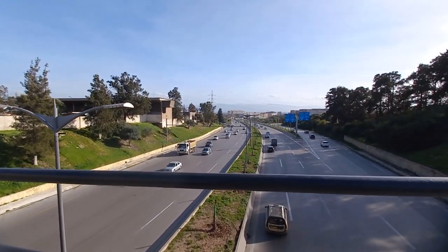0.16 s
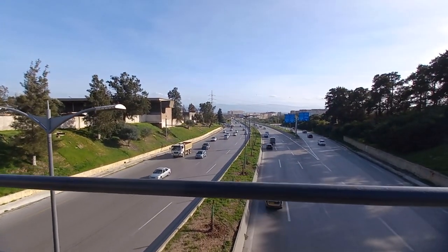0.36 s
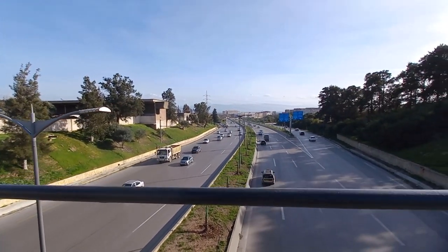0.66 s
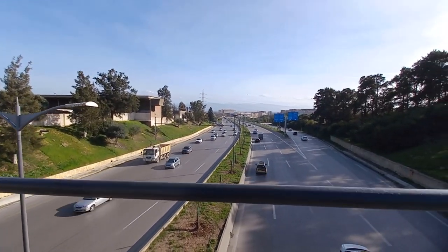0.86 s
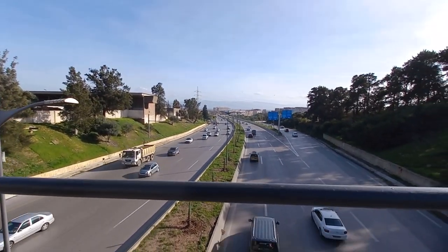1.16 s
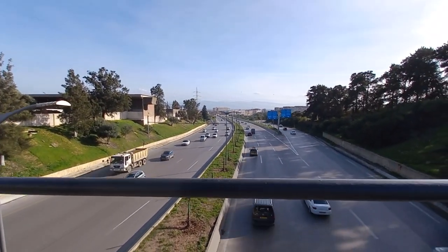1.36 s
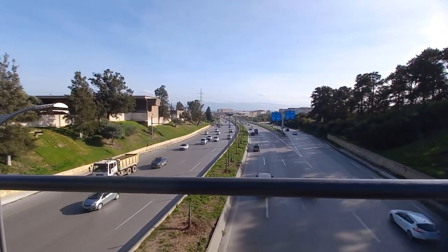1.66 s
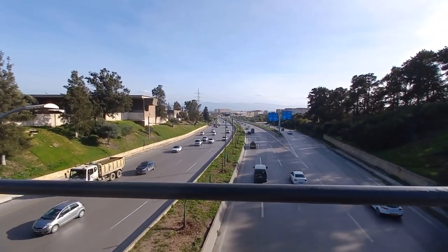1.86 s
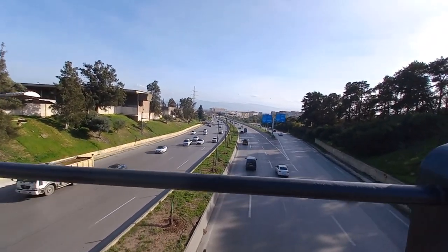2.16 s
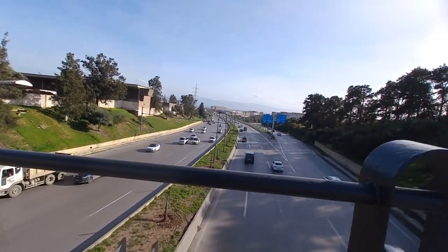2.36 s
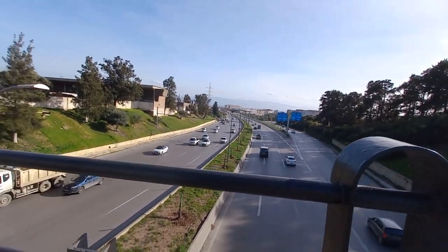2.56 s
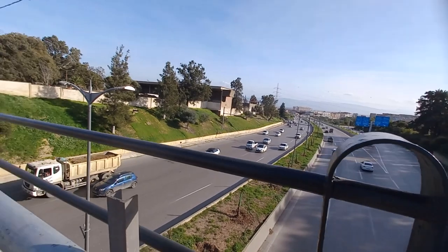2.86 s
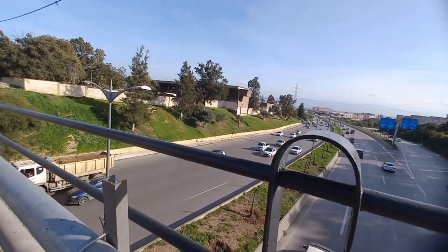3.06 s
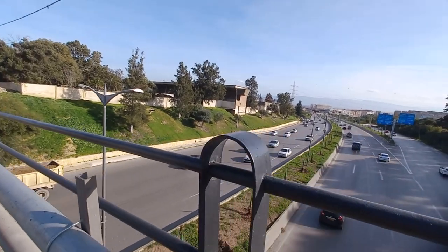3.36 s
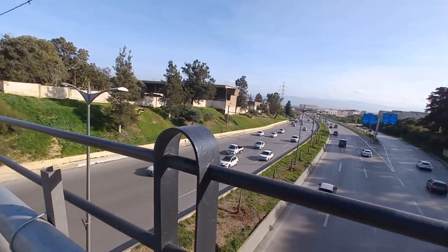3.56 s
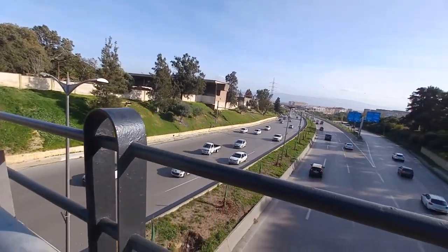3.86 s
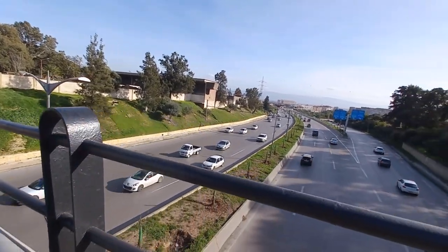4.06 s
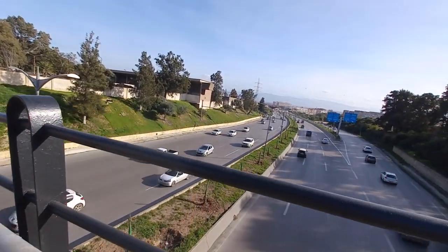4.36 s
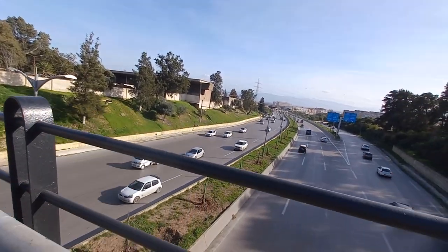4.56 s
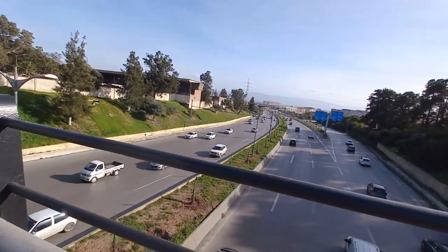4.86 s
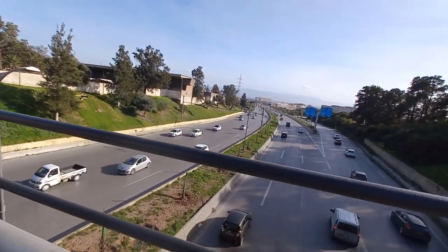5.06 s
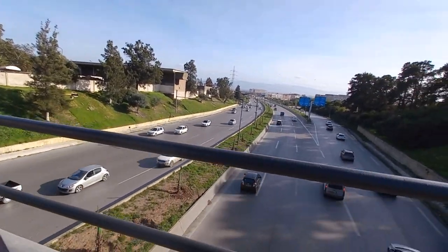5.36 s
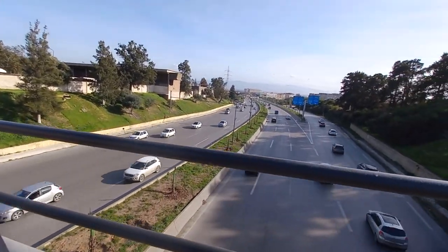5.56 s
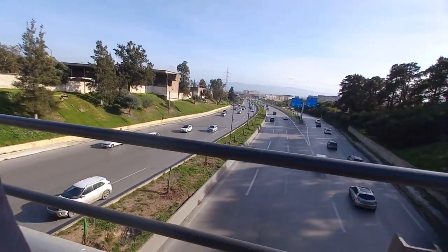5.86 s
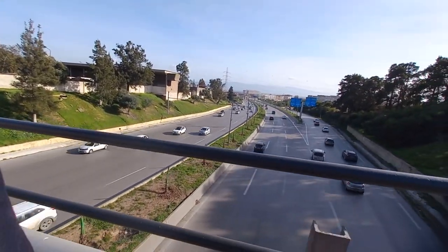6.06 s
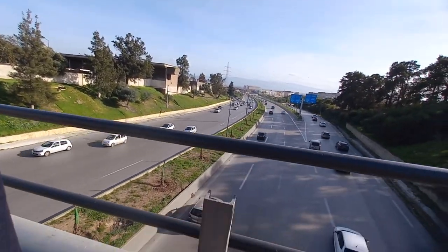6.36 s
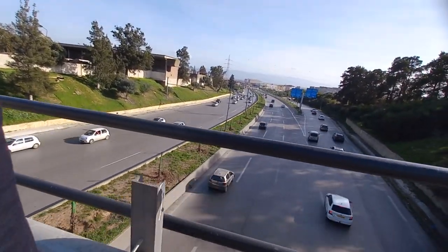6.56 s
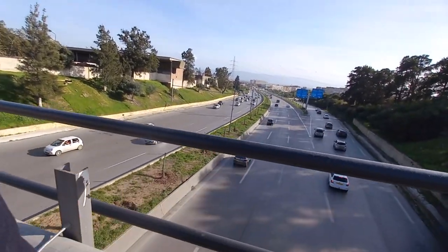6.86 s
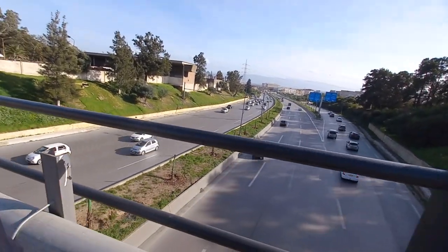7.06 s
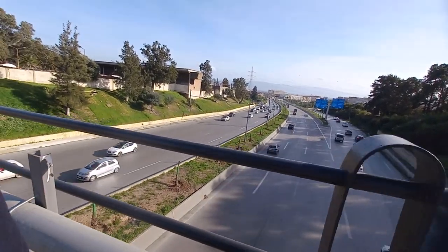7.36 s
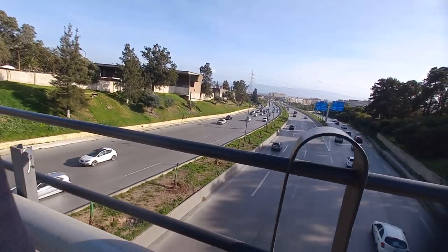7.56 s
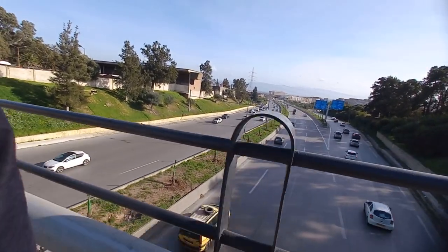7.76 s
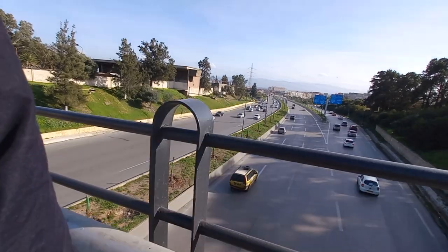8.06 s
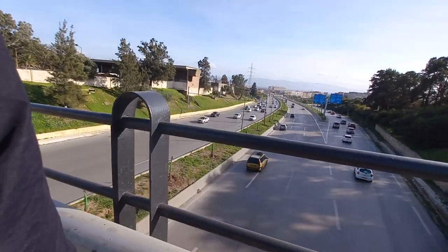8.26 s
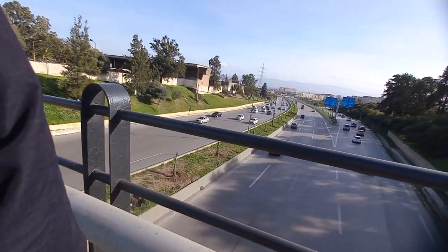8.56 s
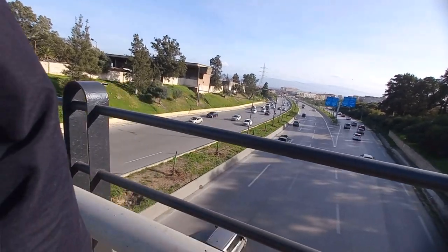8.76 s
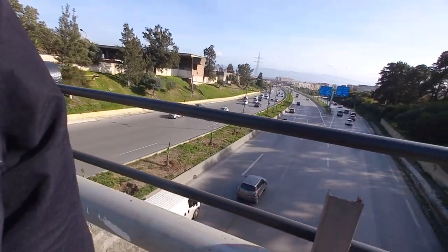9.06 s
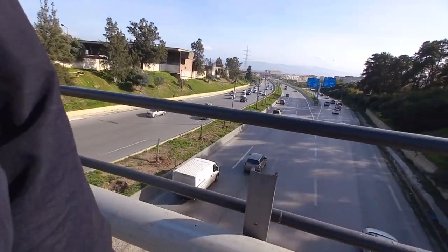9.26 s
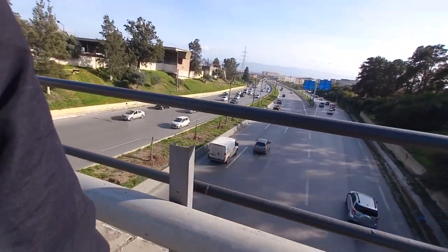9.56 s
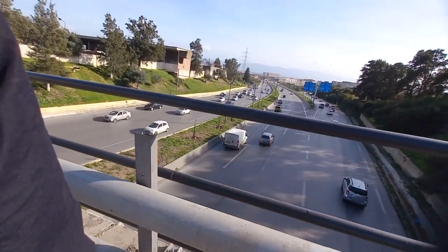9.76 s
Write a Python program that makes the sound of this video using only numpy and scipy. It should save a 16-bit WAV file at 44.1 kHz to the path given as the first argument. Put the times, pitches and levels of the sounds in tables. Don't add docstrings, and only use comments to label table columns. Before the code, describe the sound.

Broad tyre roar and hiss from many cars passing underneath, faint engine drones early and late, low deck rumble and a few short thuds.

```python
import sys
import numpy as np
from scipy import signal
from scipy.fft import rfft, irfft, dct, next_fast_len
from scipy.io import wavfile
from scipy.ndimage import uniform_filter1d, map_coordinates

SR = 44100
rng = np.random.default_rng(int(sys.argv[2]) if len(sys.argv) > 2 else 0)


def invert_db(x):
    u = np.asarray(x, float) / 20
    return 10 ** u


def transcribe(signal):
    frames = np.atleast_2d(signal).T
    limited = np.clip(frames, -1, 1)
    pcm = np.round(limited * 32767).astype(np.int16)
    wavfile.write(sys.argv[1], SR, pcm)


N = 437031

SIZE = 512
HZ = np.fft.rfftfreq(SIZE, 1 / SR)[:, None]
T = np.arange(N // (SIZE // 2) + 2) * SIZE / 2 / SR


def unit(x):
    return x / np.sqrt(np.mean(np.abs(x) ** 2) + 1e-20)


def along(points):
    f, v = np.transpose(points)
    return np.interp(np.log(HZ + 1), np.log(f + 1), v)


def curves(rows, t):
    s, *cols = np.transpose(rows)
    return [np.interp(t, s, c) for c in cols]


def octave_bump(hz, centre_hz, octaves):
    return np.exp(-(np.log2((hz + 1) / centre_hz) / octaves) ** 2 / 2)


def moment(s, length_s):
    return np.exp(-((T - s) / length_s) ** 2 / 2)


def pass_by(t, s, length_s):
    return 1 / (1 + ((t - s) / length_s) ** 2)


def patches(width_hz, length_s):
    field = rng.standard_normal((len(HZ), len(T)))
    bins = int(width_hz / HZ[1, 0]) + 1
    frames = int(length_s / T[1]) + 1
    for _ in range(2):
        field = uniform_filter1d(field, bins, 0)
        field = uniform_filter1d(field, frames, 1)
    return unit(field)


def rush(gain, pan_db, alike, lead):
    a, b = signal.stft(rng.standard_normal((2, N)), nperseg=SIZE)[2][..., :len(T)]
    turn = np.arccos(np.clip(alike, 0, 1)) / 2
    left = (np.cos(turn) * a + np.sin(turn) * b) * invert_db(pan_db / 2) * np.exp(.5j * lead)
    right = (np.cos(turn) * a - np.sin(turn) * b) * invert_db(-pan_db / 2) * np.exp(-.5j * lead)
    return signal.istft(gain * np.array([left, right]), nperseg=SIZE)[1][:, :N]


def spans(rows):
    t, guard_s = np.arange(N) / SR, 0.037
    return sum(db * np.clip(np.minimum(t - start, end - t) / guard_s + .5, 0, 1) for start, end, db in rows)


# start_s, end_s, cut_db
LEFT_GUSTS = [(.12, .21, -13), (.44, .55, -21), (.66, .69, -20), (.73, .82, -31), (.88, .92, -7),
              (1.1, 1.17, -22), (1.32, 1.35, -24), (1.63, 1.75, -19), (1.86, 1.97, -11), (3.95, 4.02, -16),
              (4.04, 4.19, -22), (4.22, 4.33, -18), (4.41, 4.63, -22), (4.66, 4.99, -24), (5.07, 5.43, -22),
              (5.52, 5.72, -21), (5.76, 5.89, -13), (5.95, 6.02, -23), (6.05, 6.3, -12), (6.32, 6.35, -11),
              (6.39, 6.5, -16), (6.53, 6.84, -17), (6.86, 7.23, -19), (7.28, 8.15, -23), (8.18, 8.58, -35),
              (8.63, 8.72, -21), (8.76, 8.79, -15), (8.82, 9.28, -24), (9.3, 9.95, -22)]
# start_s, end_s, cut_db
RIGHT_GUSTS = [(3, 3.03, -10), (3.13, 3.17, -13), (3.43, 3.46, -16), (3.55, 3.6, -18)]


def wind_guard():
    return np.array([spans(LEFT_GUSTS), spans(RIGHT_GUSTS)])


# start_s, end_s, pitch_hz, level_db
ENGINES = [
    (0, 2.9, 74.5, -38),
    (.3, 2.6, 149, -45),
    (.2, 2.95, 225, -43),
    (0, 1.5, 211, -41),
    (4, 5, 176, -48),
    (7.9, 9.91, 156, -47),
    (7.6, 9.91, 208, -46),
]


def engines():
    t, out = np.arange(N) / SR, np.zeros(N)
    for start, end, hz, db in ENGINES:
        drift, swell = [map_coordinates(rng.standard_normal(int(N * 6 / SR) + 4), [t * 6]) for _ in range(2)]
        fade = np.clip(np.minimum(t - start, end - t) / .2, 0, 1)
        phase = 2 * np.pi * np.cumsum(hz * (1 + 0.0059 * drift)) / SR
        out += fade * invert_db(db + 2.0 * swell) * np.sin(phase)
    return out


# freq_hz, likeness_0_to_1
ALIKE = [(60, .4), (250, .47), (600, .47), (780, .78), (950, .7), (1150, .45), (1400, .5), (1800, .63),
         (3300, .48), (5000, .36), (9000, .4), (13000, .45)]
# freq_hz, lead_rad
TWIST = [(60, 0), (780, .3), (950, .6), (1120, 1.7), (1400, 2.3), (1720, 2.8)]


def guarded(gain_db, spectrum):
    flutter_db = 2.5 * patches(150, 0.028)
    alike = along(ALIKE) * np.interp(T, (4, 8), (1.05, .4))
    raw = rush(invert_db(flutter_db), 0, alike, along(TWIST))
    m = next_fast_len(N + SR // 4)
    hz = np.fft.rfftfreq(m, 1 / SR)
    f, v = np.transpose(spectrum)
    shape = invert_db(np.interp(np.log(hz + 1), np.log(f), v, -60, -120))
    return invert_db(gain_db) * unit(irfft(rfft(raw, m) * shape, m)[:, :N])


# freq_hz, density_db
RUMBLE = [(25, -30), (40, -13), (55, -19), (72, 1), (120, -4.5), (180, -5), (230, -1.5), (280, -8.5),
          (320, -13)]
# peak_s, length_s, lift_db
AXLES = [(0.152, 0.046, 6.5), (1.076, 0.029, 7.5), (1.55, .07, 0), (1.833, 0.044, 2), (2.09, 0.045, 3),
         (2.45, 0.091, 1.5), (3.15, 0.14, 4), (3.5, .04, 4), (4.46, .03, 3), (5.02, 0.049, -3),
         (6.597, 0.024, 7), (6.846, 0.037, 4), (7.155, 0.14, 4.5), (7.73, 0.03, 4), (7.953, .04, 3.5),
         (8.194, 0.13, 2.5), (8.82, 0.027, 7), (9.153, .05, 2), (9.33, .04, 1.5), (9.67, 0.055, 3.5)]


def bass(guard_db):
    t = np.arange(N) / SR
    axles_db = sum(db * pass_by(t, s, length) for s, length, db in AXLES)
    return guarded(-34 + guard_db + axles_db, RUMBLE)


# time_s, level_db, lift_db_per_octave (nearer is brighter)
STREAM = [(0, 0.2, 0.74), (1.1, 1.6, -0.05), (1.65, 0.9, 0.66), (2.2, 0.2, 2.4), (3.3, 1.05, 0),
          (4.4, 0.35, 0.6), (5.5, 1.7, -1.24), (6.6, -1.5, 0.13), (7.7, -0.4, -1.46), (8.8, -1.17, 0.15),
          (9.91, -1.5, -0.4)]
# nearest_s, distance_over_speed_s, lift_db, tyre_colour_hz
CARS = [(.35, .15, 0.3, 2550), (.6, 0.21, 0.5, 800), (1.15, 0.13, 2.5, 10200), (5.87, .1, 0, 1040),
        (2.05, 0.31, 0, 13000), (3.8, 0.22, 1.5, 950), (3.05, 0.083, 5, 14400), (3.1, 0.079, 2, 880),
        (3.25, 0.11, 5.5, 3640), (3.65, 0.049, 2, 2530), (3.95, 0.14, 2, 3140), (4.65, .15, 3.5, 14400),
        (5.3, 0.1, 6.5, 14400), (5.45, 0.36, -1.5, 1240), (6.2, 0.14, 0.5, 1300), (6.53, 0.15, 4.5, 1270),
        (6.85, .08, 1.5, 3550), (7.7, 0.074, 6, 14400), (8, 0.12, 5, 1250), (8.1, 0.2, 4.5, 7060),
        (8.17, .08, 1, 1500), (8.58, 0.11, 4, 1560), (8.83, .1, 4, 1760), (8.95, 0.13, 2, 7100),
        (9.05, 0.095, 4.5, 1770), (9.2, .1, 2.5, 10200), (9.25, 0.1, 3.5, 1050), (9.42, 0.067, 2, 1210),
        (9.68, 0.047, 3.5, 1220), (9.75, .12, 5.5, 14400)]


def traffic(hz):
    level_db, lift_db = curves(STREAM, T)
    octaves = np.log2((hz + 1) / 1000)
    cars_db = sum(db * octave_bump(hz, colour_hz, 0.81) * pass_by(T, s, length)
                  for s, length, db, colour_hz in CARS)
    return level_db + lift_db * np.clip(octaves, 0, 2.6) + cars_db


# freq_hz, density_db
LOW_MIDS = [(230, -24.5), (290, 1.5), (400, 3), (500, 0.5), (620, -2), (720, -6), (800, -25)]
# start_s, end_s, lift_db
CALM = [(5.805, 7.178, 10)]


def body():
    t, lean_db = np.arange(N) / SR, 1.5
    level_db = -37.5 + spans(CALM) + .8 * np.interp(t, T, traffic(970))
    return guarded(level_db + np.array([[lean_db / 2], [-lean_db / 2]]), LOW_MIDS)


# start_s, pitch_hz, peak_db, left_over_right_db, t60_s
THUDS = [
    (1.047, 141, -28.5, -15, 0.18),
    (3.49, 140, -25, -11, 0.085),
    (5.458, 141, -20.5, -5.5, 0.098),
    (5.484, 86.5, -16, -1, 0.091),
    (5.728, 127, -12, -2, 0.047),
    (5.749, 77, -20, -10, 0.12),
    (7.111, 172, -20, -19, 0.094),
    (7.25, 90, -32, -1, 0.075),
    (8.159, 196, -20, 28, 0.04),
]


def thuds():
    out, t = np.zeros((2, N + SR)), np.arange(SR // 2) / SR
    for s, hz, db, pan_db, t60 in THUDS:
        knock = invert_db(db - 60 * t / t60) * (1 - np.exp(-t / 0.0062)) * np.sin(2 * np.pi * hz * t)
        sides = invert_db(np.array([[min(pan_db, 0)], [min(-pan_db, 0)]]))
        out[:, round(s * SR):][:, :len(t)] += 2 * knock * sides
    return out[:, :N]


# time_s, notch_hz, depth_db, ridge_hz, ridge_db
DECK = [(0, 1090, 0.5, 3180, 4), (.4, 1120, 2.5, 2840, 1.5), (.85, 1190, 6, 2220, -0.5),
        (1.7, 1110, 1, 2130, 1), (2.7, 1400, 3, 2460, 2.5), (3.9, 1550, -0.5, 2340, 3),
        (4.7, 1650, 2.2, 2460, 4.5), (5.07, 1950, 1.2, 2720, 4.5), (5.3, 2200, 0, 2940, 0.5),
        (5.8, 2240, 2.5, 3000, -1), (7.5, 2400, -1, 3300, 1), (8.4, 2880, 3, 3600, -4),
        (9.91, 3270, 2, 4600, -0.5)]


def deck():
    notch_hz, depth_db, ridge_hz, ridge_db = curves(DECK, T)
    return ridge_db * octave_bump(HZ, ridge_hz, 0.12) - depth_db * octave_bump(HZ, notch_hz, 0.12)


# freq_hz, density_db
ROAD = [(330, -36), (560, -15), (740, -2), (911, 0.5), (1250, -0.5), (1550, 0), (1780, -0.5), (2280, -6.5),
        (2970, -11.5), (4270, -22.5), (5050, -28.5), (7870, -32), (13900, -44.5), (15600, -41)]
# peak_s, length_s,
# centre_hz, width_hz, change_db
TREADS = [(.45, .25, 1580, 130, 4), (.48, .16, 4200, 230, 6), (1.25, .22, 2200, 180, 2),
          (1.05, .25, 1750, 150, -2), (2.3, .3, 4250, 250, 3), (3.1, .17, 3550, 150, 4),
          (3.1, .2, 2500, 150, 2), (4.65, .15, 2750, 200, 4), (6.5, .15, 1250, 200, 2),
          (9.6, .3, 3300, 400, -3), (7.2, .4, 2250, 250, -3), (2.85, .25, 1650, 200, 2),
          (6.1, .3, 2950, 200, 2), (8.65, .1, 1050, 250, 2)]
# peak_s, length_s, change_db
SHADES = [
    (0.74, 0.029, -1.5),
    (1.714, 0.041, -1),
    (5.157, 0.064, -3.5),
    (6.698, .05, -1),
    (8.413, 0.085, -3.5),
]
# time_s, left_lead_ms, focus_0_to_1
BEARING = [(0, .95, 1), (.9, 1.02, .75), (1.8, .87, .9), (3.15, .87, 1), (4.95, .82, .85), (5.4, .88, .62),
           (7.65, .93, .37), (8.1, 1, .95), (9, .96, .88), (9.45, .98, .55), (9.91, .85, .67)]
# freq_hz, left_over_right_db
LEAN = [(700, 1.5), (1200, -1.5), (2000, -2), (2800, -2), (4200, 0.5), (6500, .5), (15000, -.5)]
# time_s, share_of_lean
TURN = [
    (0, 1.04),
    (3.6, 1.1),
    (6.3, .7),
    (9.91, 0.17),
]


def tyres(loud_db=-18):
    level_db = traffic(HZ) + deck()
    level_db = level_db - level_db.mean(axis=1, keepdims=True)
    for s, length, hz, width, db in TREADS:
        level_db = level_db + db * moment(s, length) * np.exp(-((HZ - hz) / width) ** 2 / 2)
    for s, length, db in SHADES:
        level_db = level_db + db * moment(s, length)
    level_db = level_db + .5 * patches(200, .3) + .9 * patches(900, .014)
    level_db = level_db + .7 * patches(8000, .014) + .35 * patches(500, .07)
    level_db = level_db + along([(3000, 0), (12000, 1.0)]) * patches(2500, .025)
    level_db = level_db + along([(6000, 0), (10000, 0.5)]) * patches(200, .04)
    colour = unit(invert_db(along(ROAD) + along([(600, -9.5), (730, -4)])))
    lead_ms, focus = curves(BEARING, T)
    lead_ms = lead_ms + .015 * patches(2500, .4)
    lead = along(TWIST) + 2 * np.pi * np.maximum(HZ - 1720, 0) * lead_ms / 1000
    alike = along(ALIKE) * focus * invert_db(1.2 * patches(400, .3))
    pan_db = along(LEAN) * curves(TURN, T)[0] + .5 * patches(600, .4)
    return rush(colour * invert_db(level_db + loud_db), pan_db, alike, lead)


def scene():
    guard_db = wind_guard()
    return tyres() + bass(guard_db) + body() + engines() * invert_db(guard_db + 0.5) + thuds()


# freq_hz, signal_over_step_db
STEPS = [(200, 22), (1600, 16), (3000, 10), (5200, 4), (7600, 1), (9100, -2), (9500, -8), (13000, -8.5),
         (14500, -9.5), (15500, -11.5)]


def coarse(x, spread_db, size=1024, start=803, count=32):
    pad = np.pad(x, ((0, 0), (2 * size - start, 3 * size)))
    frames = pad.shape[1] // size - 1
    window = np.sin(np.pi * (np.arange(2 * size) + .5) / (2 * size))
    places = np.arange(frames)[:, None] * size + np.arange(2 * size)
    a, b, c, d = np.split(pad[:, places] * window, 4, axis=2)
    lines = dct(np.concatenate([-c[..., ::-1] - d, a - b[..., ::-1]], axis=2), type=4, norm="ortho")
    bands = lines.reshape(2, frames, -1, count)
    power = uniform_filter1d(np.mean(bands ** 2, axis=(0, 3)), size=7, axis=0)
    level = np.sqrt(np.abs(power) + 1e-18)
    f, v = np.transpose(STEPS)
    margin_db = np.interp((np.arange(size // count) + .5) * count * SR / 2 / size, f, v)
    step = (level * invert_db(spread_db * rng.standard_normal(level.shape) - margin_db))[..., None]
    kept = np.sign(bands) * np.floor(np.abs(bands) / step + .4) * step
    p, q = np.split(dct(kept.reshape(lines.shape), type=4, norm="ortho"), 2, axis=2)
    halves = np.concatenate([q, -q[..., ::-1], -p[..., ::-1], -p], axis=2) * window
    out = halves[:, 1:, :size] + halves[:, :-1, size:]
    return out.reshape(2, -1)[:, size - start:][:, :N]


def top_cut(x):
    return signal.sosfilt(signal.butter(12, 15720, fs=SR, output="sos"), x)


def record(dry):
    limited = dry / (1 + np.abs(dry / .85) ** 4) ** .25
    mix = coarse(limited, spread_db=1.5)
    return top_cut(mix)


dry = scene()
out = record(dry)
transcribe(out)
```